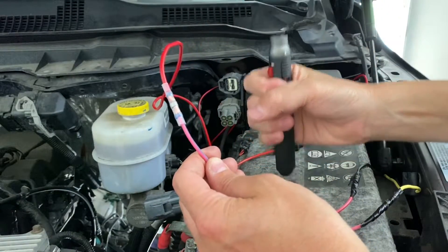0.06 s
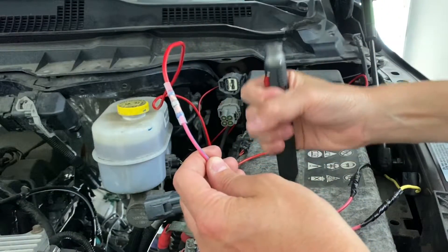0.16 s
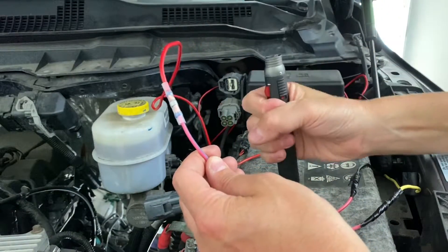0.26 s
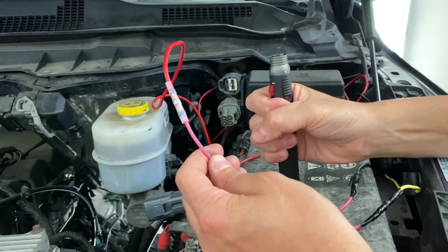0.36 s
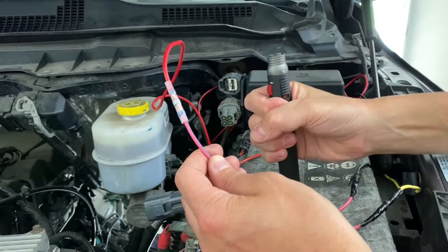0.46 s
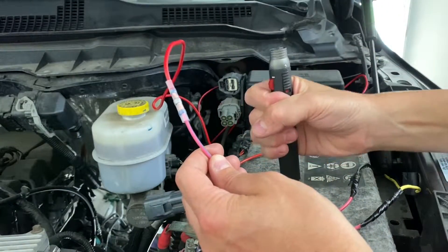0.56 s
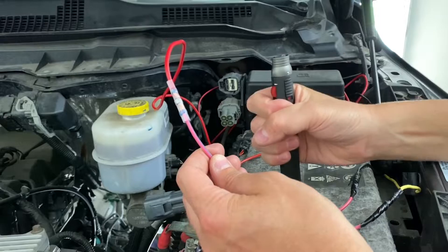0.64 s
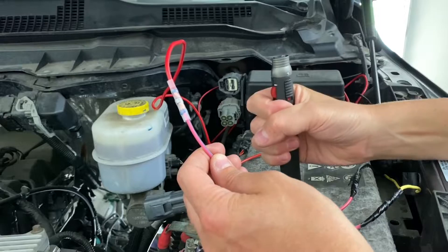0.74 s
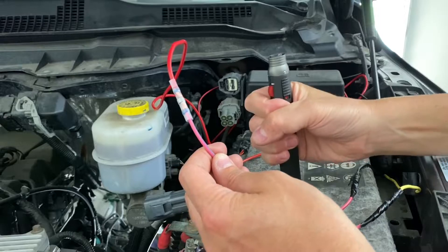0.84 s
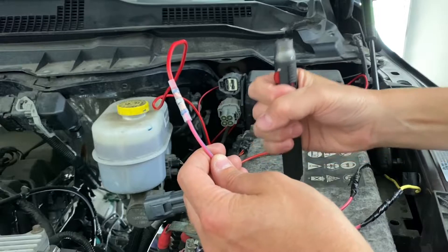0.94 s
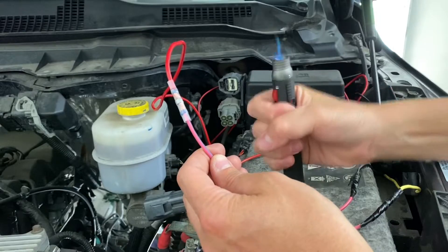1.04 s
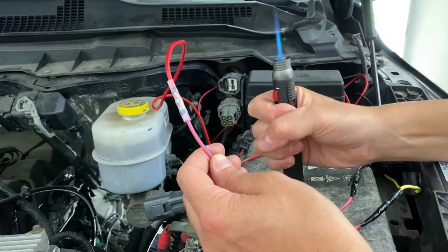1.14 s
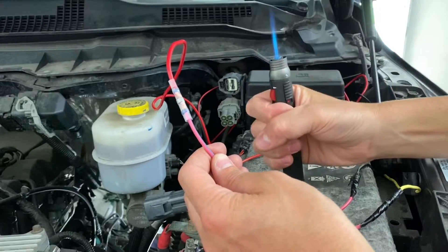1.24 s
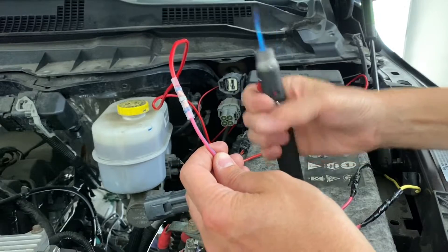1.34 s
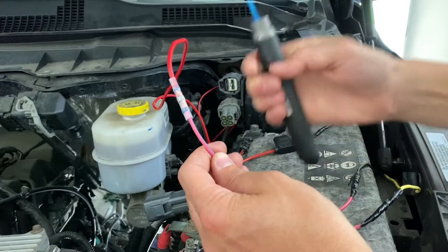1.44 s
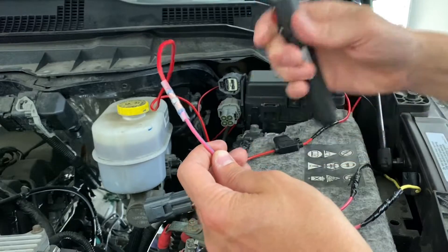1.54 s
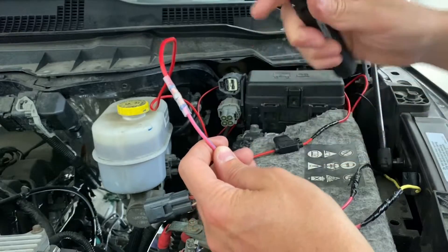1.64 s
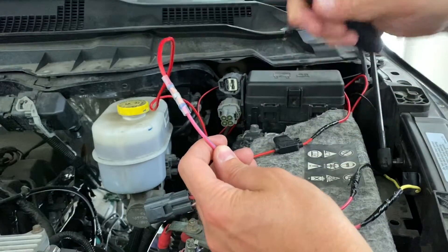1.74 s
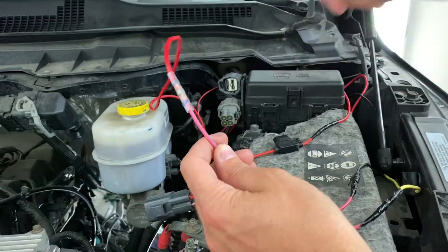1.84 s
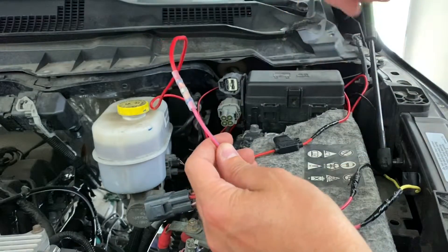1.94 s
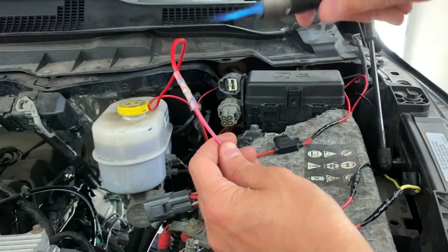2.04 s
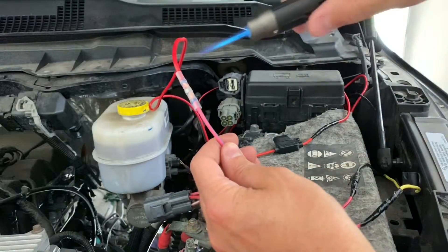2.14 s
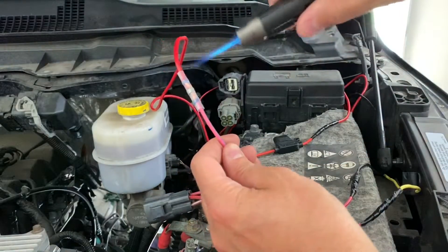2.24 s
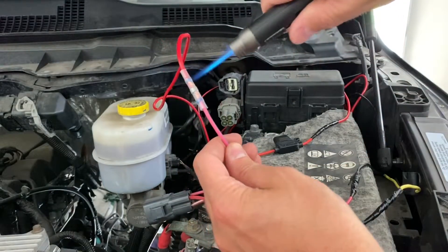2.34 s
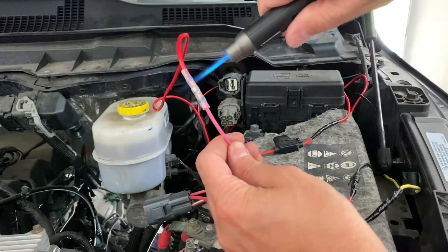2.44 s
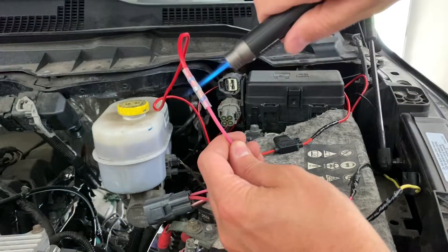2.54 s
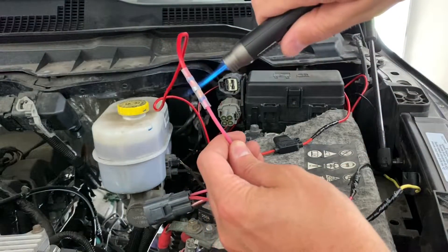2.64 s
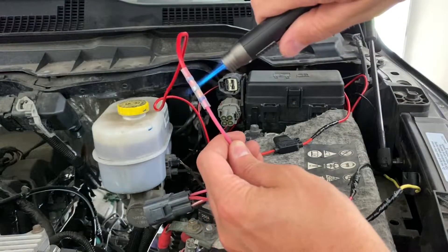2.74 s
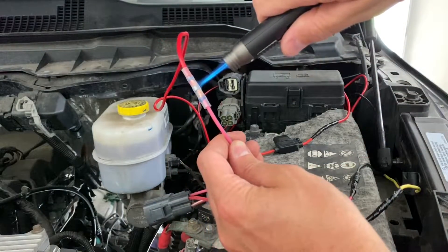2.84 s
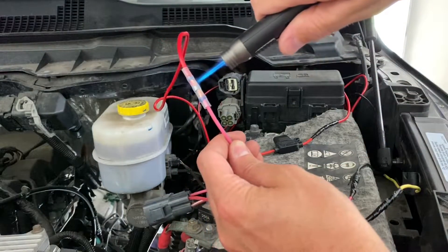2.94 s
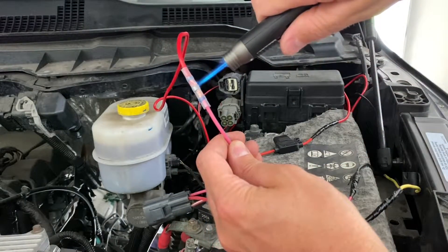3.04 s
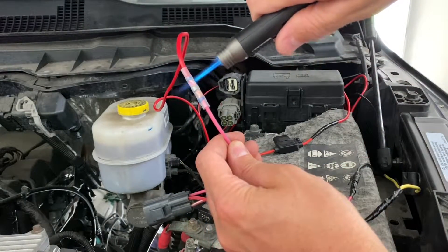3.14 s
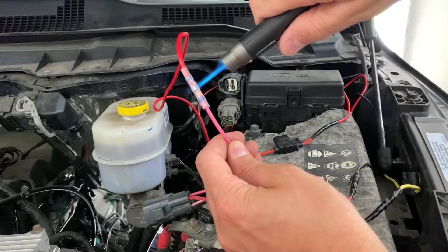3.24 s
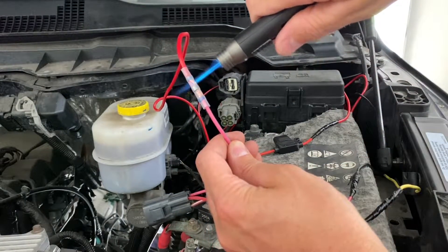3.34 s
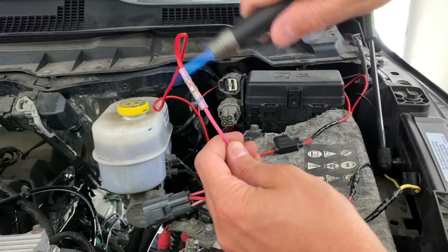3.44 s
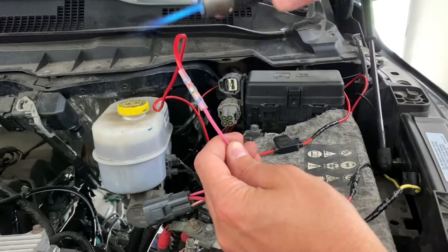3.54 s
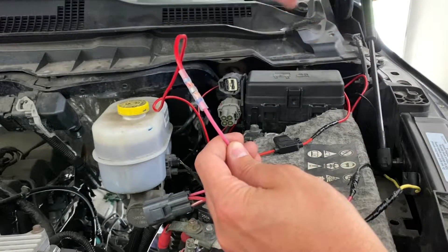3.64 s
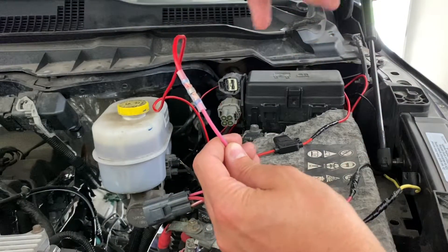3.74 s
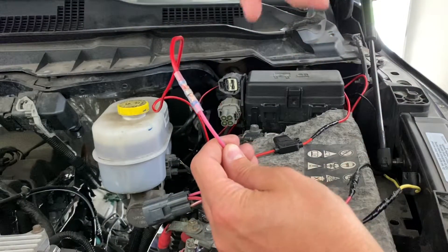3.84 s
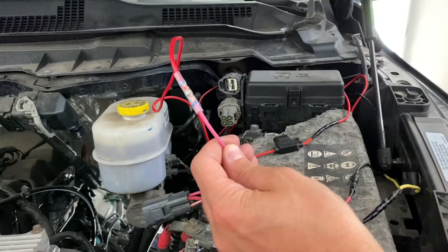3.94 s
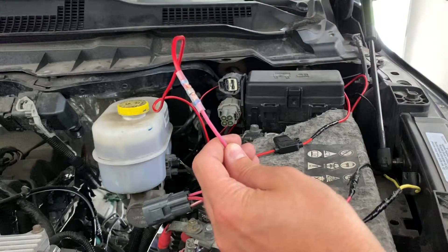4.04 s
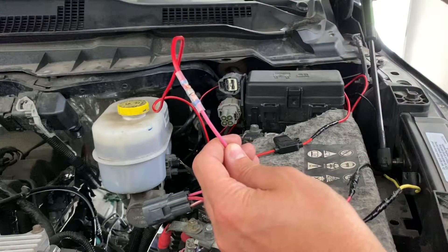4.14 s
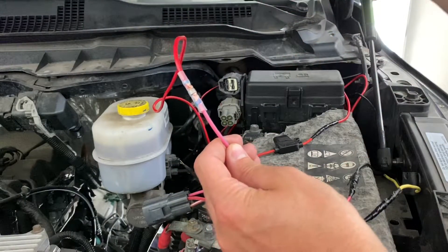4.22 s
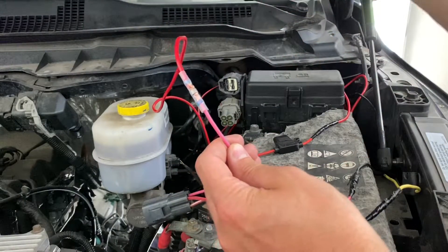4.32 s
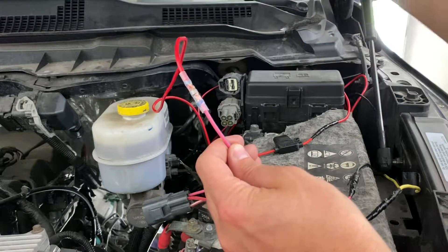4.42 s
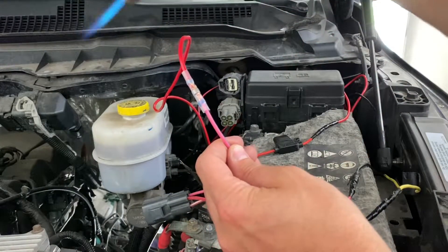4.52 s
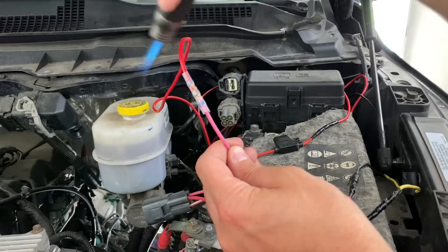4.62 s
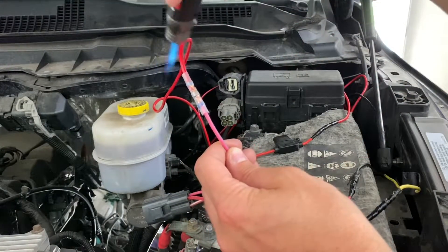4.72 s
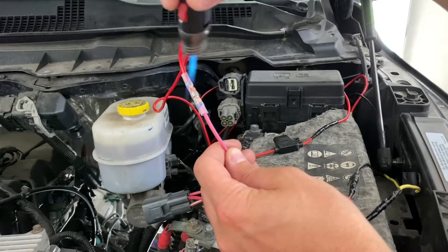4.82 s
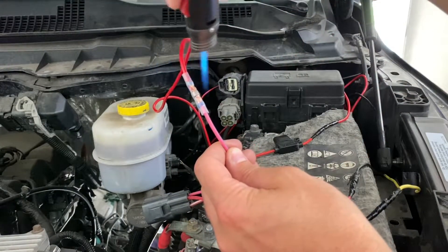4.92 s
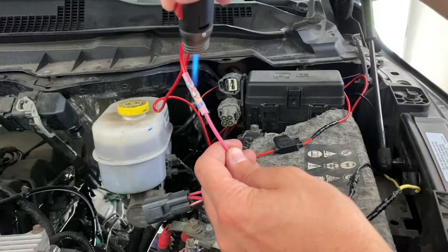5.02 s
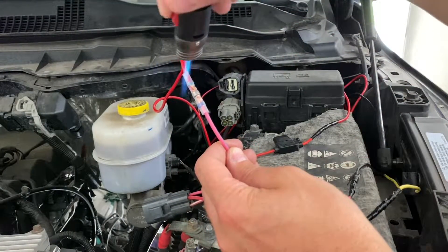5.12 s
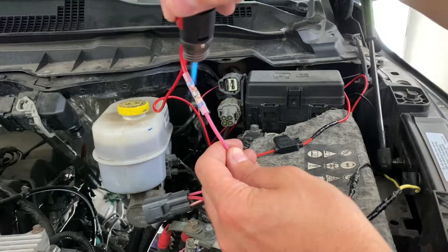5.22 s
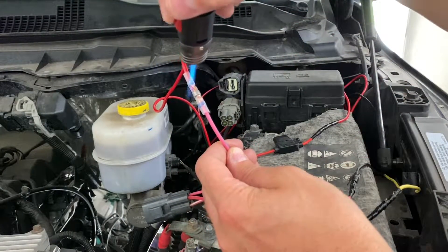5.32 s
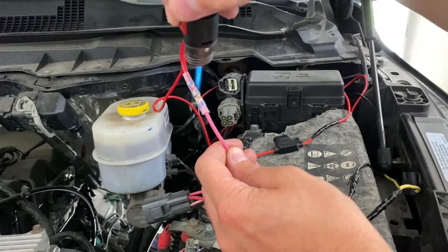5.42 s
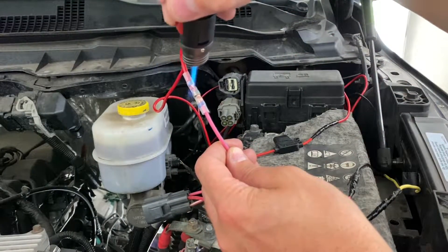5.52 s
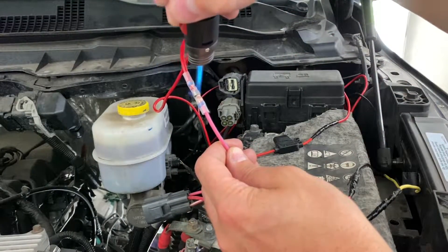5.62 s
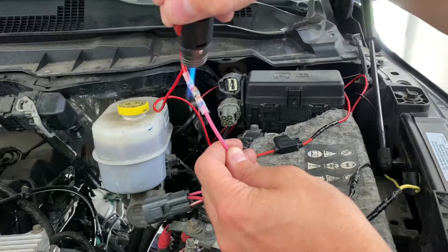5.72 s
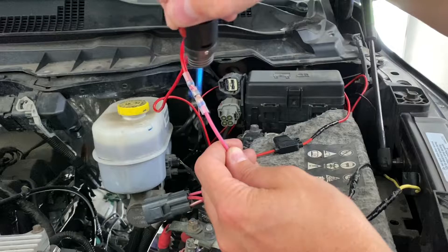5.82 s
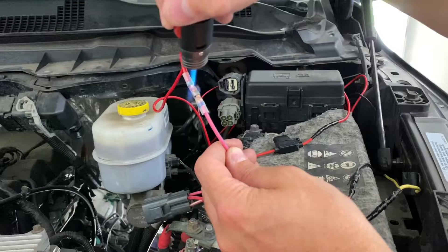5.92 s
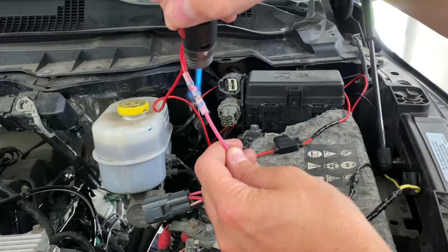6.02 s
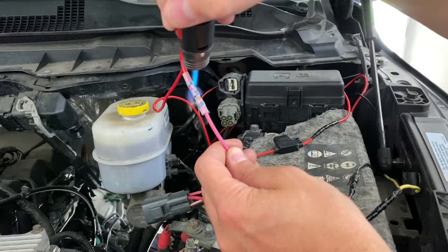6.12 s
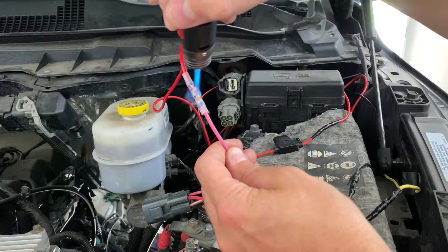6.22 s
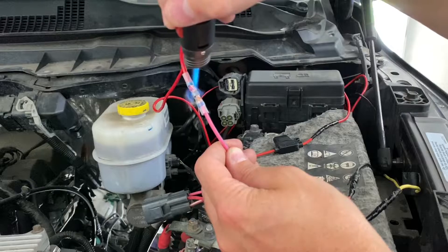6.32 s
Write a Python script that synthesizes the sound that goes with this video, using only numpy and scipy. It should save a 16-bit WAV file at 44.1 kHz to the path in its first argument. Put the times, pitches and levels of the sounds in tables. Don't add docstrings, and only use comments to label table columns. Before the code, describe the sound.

Close to a phone in a garage, a pencil torch hisses very faintly while its plastic slider ticks and its igniter snaps hard three times in the first second. The third snap lights it with a soft low thump. A quiet, airy flame follows, fluttering in short gusts whenever the hand swings, steadier when held. Low traffic rumble lies behind, rising toward the end.

```python
import sys
import numpy as np
from scipy import signal
from scipy.fft import rfft, irfft, next_fast_len
from scipy.io import wavfile
from scipy.ndimage import uniform_filter1d, map_coordinates

SR = 44100
rng = np.random.default_rng(int(sys.argv[2]) if len(sys.argv) > 2 else 0)


def voltage_ratio(level):
    return 10 ** (np.asarray(level, float) / 20)


def store_pcm(level_fs):
    pcm = np.round(np.clip(level_fs, -1, 1) * 32767).astype(np.int16)
    wavfile.write(sys.argv[1], SR, np.atleast_2d(pcm).T)


N = 280917


def unit(x):
    return x / np.sqrt(np.mean(x ** 2) + 1e-20)


def along(points, hz):
    f, v = np.transpose(points)
    return np.interp(np.log(hz + 1), np.log(f + 1), v)


def curves(rows):
    s, *cols = np.transpose(rows)
    return [np.interp(np.arange(N) / SR, s, c) for c in cols]


def wobble(rate_hz):
    knots = rng.standard_normal(int(N * rate_hz / SR) + 4)
    return map_coordinates(knots, [np.arange(N) * rate_hz / SR])


def filtered(x, response):
    m = next_fast_len(N + SR // 2)
    return irfft(rfft(x, m) * response(np.fft.rfftfreq(m, 1 / SR)), m)[..., :N]


def modes(table):
    def response(f):
        total = 0
        for k, (c, w, db) in enumerate(table):
            total = total + (-1) ** k * voltage_ratio(db) * 1j * f * w / (c * c - f * f + 1j * f * w)
        return total
    return response


# f/Hz, correlation/1
LIKENESS = [(60, .975), (130, .94), (290, .7), (640, .45), (1400, .5), (3100, .35), (6800, .5)]


def rush(response, patchy_db):
    z = signal.stft(rng.standard_normal((2, N)), nperseg=512)[2]
    field = uniform_filter1d(rng.standard_normal(z.shape[1:]), size=5, axis=0)
    field = uniform_filter1d(field, size=10, axis=1)
    pair = signal.istft(z * voltage_ratio(patchy_db * unit(field)), nperseg=512)[1][:, :N]

    def mid_side(hz):
        turn = np.arccos(np.clip(along(LIKENESS, hz), -1, 1)) / 2
        return response(hz) * [np.cos(turn), np.sin(turn)]

    mid, side = filtered(pair, mid_side)
    return unit(np.array([mid + side, mid - side]))


# t/s, level/dB
TRAFFIC = [(0, -59), (1.9, -57.5), (2.4, -57.5), (3.3, -58), (3.9, -57), (4.5, -54.5), (4.9, -51.5),
           (6.37, -50.5)]
# f/Hz, level/dB
RUMBLE_SPECTRUM = [(15, -51), (25, -20), (34, -15.5), (80, 3.5), (140, -5.5), (182, -9), (238, -11.5),
                   (316, -16), (420, -12.5), (550, -43), (920, -120)]
# f/Hz, width/Hz, level/dB
FAR_ENGINE = [(58.4, 6.8, 0)]
# f/Hz, level/dB
AIR_SPECTRUM = [(90, -43), (150, -11.5), (300, -5), (500, -10), (800, -11), (1500, -14), (2650, -24),
                (3050, -36.5), (3600, -27.5), (6000, -29), (7200, -45), (8000, -9.5), (10000, -46.5),
                (16500, -90)]


def background():
    level_db, = curves(TRAFFIC)
    mean_db = level_db.mean()
    swell_db = level_db - mean_db
    rumble = unit(voltage_ratio(1.17 * wobble(13)) * rush(lambda hz: voltage_ratio(along(RUMBLE_SPECTRUM, hz)), patchy_db=1.4))
    drone = rush(modes(FAR_ENGINE), patchy_db=0.5)
    air = rush(lambda hz: voltage_ratio(along(AIR_SPECTRUM, hz)), patchy_db=2.1)
    street = voltage_ratio(mean_db + 5 + 0.71 * swell_db) * rumble + voltage_ratio(mean_db + 5 + 1.1 * swell_db) * drone
    return street + voltage_ratio(-59) * air


SNAP_T_S = [
    .2633,
    .6152,
    1.0518,
]
SNAP_LEVEL_DB = [-10.5, -10, -9]


def blows():
    rebound_s, rebound_db, rattle_s = .0024, -0.7, 0.0015
    snaps = list(zip(SNAP_T_S, SNAP_LEVEL_DB))
    first = [(s, db, db - 15, rattle_s) for s, db in snaps]
    second = [(s + rebound_s, db + rebound_db, db - 16, rattle_s) for s, db in snaps]
    return first + second


# f/Hz, level/dB
WALL_COLOUR = [(300, -12), (600, -2.5), (1000, 3), (2000, 3), (3200, -2), (3800, -4.5), (4150, 4.5),
               (4600, 0), (5100, -3), (6700, -3), (9000, -8.5), (14000, -14.5), (17000, -26)]
# f/Hz, t60/s
GARAGE_T60 = [(300, 0.78), (1000, 0.3), (4000, 0.77), (8000, 0.74), (14000, 0.26)]


def garage():
    length = SR * 2 // 3
    hz, t, _ = signal.stft(np.zeros(length), SR, nperseg=256)
    walls = voltage_ratio(-60 * t / along(GARAGE_T60, hz)[:, None] - 13)
    metal = voltage_ratio(-60 * t / 0.035)
    decay = voltage_ratio(along(WALL_COLOUR, hz))[:, None] * (walls + metal)
    tank = np.abs(modes(TANK_MODES)(hz))[:, None]
    out = np.zeros((2, N))
    for s, db, knock_db, _ in blows() + SLIDER_TICKS:
        z = signal.stft(rng.standard_normal((2, length)), nperseg=256)[2]
        strength = np.hypot(voltage_ratio(db), voltage_ratio(knock_db + 18) * tank)
        tail = signal.istft(z * decay * strength, nperseg=256)[1][:, :length]
        out[:, round(s * SR) + 90:][:, :length] += tail
    return voltage_ratio(-14) * out


# f/Hz, width/Hz, level/dB
TANK_MODES = [(560, 300, -6), (960, 230, 0), (1400, 400, -11)]


def contacts(events, body, t60_s):
    bright, dull, t = np.zeros(N + SR), np.zeros(N), np.arange(SR // 20) / SR
    for s, db, knock_db, length_s in events:
        chips = rng.standard_normal(len(t)) * voltage_ratio(3.6 * rng.standard_normal(len(t)))
        decay = voltage_ratio(-60 * np.maximum(t - length_s, 0) / t60_s)
        shape = (1 + 0.72 * np.exp(-t / 0.00056)) * decay
        rattle = unit(shape * chips) * np.sqrt(np.mean(shape ** 2))
        bright[round(s * SR):][:len(t)] += voltage_ratio(db - 2) * rattle
        dull[round(s * SR) + 20] = voltage_ratio(knock_db + 38)
    knock = filtered(dull, lambda hz: modes(TANK_MODES)(hz) ** 2)
    return filtered(bright[:N], body) + knock


# t/s, peak/dB, tank knock/dB, rattle/s
SLIDER_TICKS = [(.0050, -35, -70, 0.0014), (.0180, -22, -28.5, 0.0034), (0.1866, -28.5, -26, 0.00068),
                (0.472, -51, -45, .001), (0.5374, -22, -30, 0.00078), (0.546, -40, -32.5, .001),
                (0.588, -33, -28, 0.00074), (0.5922, -40, -31, .001), (0.834, -53.5, -42.5, 0.0011),
                (0.8904, -24.5, -29, 0.0014), (0.8938, -32, -39, 0.0014), (0.8961, -41.5, -31.5, .001),
                (0.901, -42.5, -59, .001), (1.0356, -26.5, -23, 0.00082), (1.3228, -23.5, -30.5, 0.0031),
                (1.329, -31.5, -30, 0.00091)]
# f/Hz, width/Hz, level/dB
SLIDER_MODES = [(2300, 880, 2.4), (4350, 390, 5.5), (6100, 4400, -10.5), (9800, 1500, -16),
                (13540, 3800, -18)]
# f/Hz, width/Hz, level/dB
CRACK_MODES = [(2370, 4200, -4.5), (5930, 3700, -3.5), (10200, 6600, -3.5), (14180, 6800, -7)]
# f/Hz, width/Hz, level/dB
SHELL_MODES = [(1880, 470, -4.5), (2500, 200, -10.5), (4010, 330, -1.5), (5100, 203, -14),
               (5870, 310, -17.5), (6730, 640, -3), (8980, 500, -7)]
# f/Hz, width/Hz, level/dB
ANVIL_MODES = [(1050, 620, 16.5), (1450, 440, 14.5), (1934, 600, 13)]


def igniter():
    steel = lambda hz: modes(CRACK_MODES)(hz) + 1.42 * modes(SHELL_MODES)(hz)
    hammer = contacts(blows(), steel, t60_s=0.0011)
    push = np.zeros(N)
    push[np.round(np.array(SNAP_T_S) * SR).astype(int) + 22] = voltage_ratio(SNAP_LEVEL_DB)
    slider = contacts(SLIDER_TICKS, modes(SLIDER_MODES), t60_s=0.0062)
    return (hammer + filtered(push, modes(ANVIL_MODES)) + slider) * voltage_ratio([[.4], [-.4]])


# t/s, level/dB, f/Hz, t60/s
PUFFS = [
    (.275, -35.5, 153, 0.029),
    (.628, -43, 186, 0.064),
    (1.06, -38.5, 95.4, 0.16),
]


def ignition():
    t = np.maximum(np.arange(N) / SR - np.array(PUFFS)[:, :1], 0)
    db, hz, t60_s = np.array(PUFFS).T[1:, :, None]
    swell = 1 - np.exp(-t / 0.0058)
    return 3 * np.sum(voltage_ratio(db - 60 * t / t60_s) * swell * np.sin(2 * np.pi * hz * t), 0)


# start/s, end/s, f/Hz, level/dB
TUBE_NOTES = [(1.25, 1.85, 1185, -61.5), (2.1, 3.5, 1484, -65), (3.55, 3.85, 933, -57),
              (3.902, 4.423, 1110, -60.5), (5.2, 5.948, 935, -64)]


def singing():
    t, out, breath = np.arange(N) / SR, 0, rng.standard_normal(N)
    for start, end, note_hz, db in TUBE_NOTES:
        held = np.clip(np.minimum(t - start, end - t) / 0.082, 0, 1)
        note = signal.lfilter(*signal.iirpeak(note_hz, 5, SR), breath)
        note = signal.lfilter(*signal.iirpeak(note_hz, 9, SR), note)
        out = out + voltage_ratio(db + 1.6 * wobble(9.7)) * held * unit(note)
    return out * voltage_ratio([[1.8], [-1.8]])


def burning():
    lit_s, catch_s = 1.01, 0.13
    return np.clip((np.arange(N) / SR - lit_s) / catch_s, 0, 1)


# start/s, end/s, extra path/ms, strength/1
MIRRORS = [
    (-.2, 1.5, 1.85, .45),
    (2.2, 3.45, .95, .33),
    (4.95, 6.6, .96, .35),
]


def resting():
    settle_s, tremor_ms = .2, .04
    t = np.arange(N) / SR
    start, end, ms, strength = np.array(MIRRORS).T[:, :, None]
    held = np.clip(np.minimum(t - start, end - t) / settle_s, 0, 1)
    nearest = np.argmin(np.maximum(start - t, t - end), axis=0)
    return ms[nearest, 0] + tremor_ms * wobble(2.5), np.sum(strength * held, axis=0)


# t/s, jet level/dB, flame stirring/1
HAND_MOTION = [(0, -59.5, .6), (1.05, -59.5, 0.95), (1.25, -58.5, .6), (1.6, -57.5, 1), (1.85, -53.5, 0.62),
               (2.02, -52.5, 0.23), (2.25, -56, 0.43), (2.7, -56, 0.3), (3.02, -60, 0.79),
               (3.25, -57.5, 0.35), (3.45, -55.5, 0.32), (3.65, -54, 0.96), (4.2, -58, 0.61),
               (4.56, -57, 0.81), (4.85, -55.5, 0.68), (5.2, -56.5, 0.2), (5.65, -55.5, 0.31),
               (6.37, -55, 0)]
# f/Hz, level/dB
NOZZLE_SPECTRUM = [(6000, -30), (8000, -31), (10000, -8), (11500, -1.5), (13000, 2.5), (14500, 2.5),
                   (15600, -8.5), (16500, -23)]
# t/s, level/dB
NOZZLE_SPITS = [(3.551, -48), (3.9, -52), (4.37, -34.5), (4.901, -48), (6.262, -49.5)]


def jet():
    high_db, stir = curves(HAND_MOTION)
    low_db = high_db - 7 + burning() * (2.5 + 5 * stir)
    path_ms, strength = resting()
    gas = rng.standard_normal(N) * voltage_ratio(1.6 * wobble(25))
    mirror = lambda ms: map_coordinates(gas, [np.arange(N) - ms * SR / 1000], mode="nearest")
    combed = gas + strength * (mirror(path_ms) + 0.55 * mirror(path_ms + 1.1))
    upper = lambda hz: np.clip((hz - 11000) / 2200, 0, 1)
    low = unit(filtered(combed, lambda hz: voltage_ratio(along(NOZZLE_SPECTRUM, hz)) * (1 - upper(hz))))
    high = unit(filtered(combed, lambda hz: voltage_ratio(along(NOZZLE_SPECTRUM, hz)) * upper(hz)))
    t = np.arange(N) / SR - np.array(NOZZLE_SPITS)[:, :1]
    spit_db = np.array(NOZZLE_SPITS)[:, 1:] - 60 * np.abs(t - .001) / 0.024
    burst = np.sum(voltage_ratio(spit_db) * (t > 0), axis=0)
    spray = filtered(rng.standard_normal(N), lambda hz: hz / (hz + 1500) + modes([(1600, 300, 6)])(hz))
    return voltage_ratio(low_db) * low + voltage_ratio(high_db + 2) * high + burst * spray


# f/Hz, width/Hz, level/dB
TUBE_MODES = [(429, 95, 2), (665, 90, 2.5), (958, 110, 0), (1253, 151, -4), (1520, 140, -8),
              (2044, 48, -10), (2615, 150, -17)]
# f/Hz, level/dB
TEAR_SPECTRUM = [(250, -9.5), (500, -5.5), (1400, -3.5), (2200, -4), (3400, -9.5), (5500, -13.5),
                 (7600, -15.5), (9500, -13), (12000, -26), (17000, -62.5)]
# start/s, length/s, level/dB, loudest tube note f/Hz
SWINGS = [(1.57, 0.05, -43.5, 1210), (1.762, 0.08, -39.5, 1100), (1.899, 0.071, -36.5, 1050),
          (1.977, 0.14, -47.5, 1006), (2.96, 0.047, -51, 1400), (2.999, 0.04, -42, 1530),
          (3.089, 0.032, -44.5, 1030), (3.444, 0.072, -50, 1320), (3.664, 0.031, -46.5, 980),
          (3.925, 0.043, -61, 1100), (4.025, 0.052, -48, 1090), (4.113, 0.048, -52.5, 1100),
          (4.197, 0.059, -43.5, 706), (4.395, 0.06, -37, 1150), (4.457, 0.067, -39.5, 570),
          (4.55, 0.032, -46, 1400), (4.588, 0.036, -40.5, 900), (4.704, 0.073, -44.5, 1010),
          (5.066, 0.045, -48.5, 910)]


def flame():
    stir = curves(HAND_MOTION)[1]
    ragged = wobble(110)

    def tube(hz):
        return modes(TUBE_MODES)(hz) * hz ** 2 / (hz ** 2 + 300 ** 2) / (1 + (hz / 2850) ** 12)

    roar = unit(voltage_ratio(1.2 * ragged) * rush(tube, patchy_db=1.2))
    tearing = rush(lambda hz: voltage_ratio(along(TEAR_SPECTRUM, hz)), patchy_db=2.5)
    flutter = unit(voltage_ratio(2.2 * ragged + 1.6 * wobble(600)) * tearing)
    roar_db = -55 + 2 * stir
    flutter_db = -70.5 + 13.5 * stir + 0.88 * wobble(7.6)
    out = burning() * (voltage_ratio(roar_db) * roar + voltage_ratio(flutter_db) * flutter)
    gust_roar, gust_flutter = roar[:, ::-1], flutter[:, ::-1]
    for s, length_s, torn_db, note_hz in SWINGS:
        span = slice(round((s - .02) * SR), round((s + length_s + .03) * SR))
        t = np.arange(N)[span] / SR
        rise = np.clip((t - s) / 0.026 + .5, 0, 1)
        fall = np.clip((s + length_s - t) / 0.036 + .5, 0, 1)
        note = signal.lfilter(*signal.iirpeak(note_hz, 3, SR), gust_roar[:, span])
        torn = unit(voltage_ratio(2.6 * ragged[span]) * (0.76 * gust_roar[:, span] + 0.71 * note))
        fray = voltage_ratio(torn_db - 10 + 6.5 * stir[span]) * gust_flutter[:, span]
        out[:, span] += rise * fall * (voltage_ratio(torn_db - 3) * torn + fray)
    return out * voltage_ratio([[1.8], [-1.8]])


def scene():
    return background() + garage() + igniter() + ignition() + singing() + jet() + flame()


# f/Hz, level per bin/dB
GATE_THRESHOLD = [(2300, -120), (2900, -90.5), (6500, -96), (8000, -100), (9000, -120)]


def suppress(x):
    hz, _, z = signal.stft(x, SR, nperseg=1024)
    power = uniform_filter1d(np.abs(z.mean(0)) ** 2, size=3, axis=0)
    power = uniform_filter1d(power, size=3, axis=1)
    threshold = voltage_ratio(along(GATE_THRESHOLD, hz))[:, None] ** 2
    keep = 1 / (1 + (threshold / (np.abs(power) + 1e-20)) ** 3)
    return signal.istft(z * keep, SR, nperseg=1024)[1][:, :N]


def top_cut(x):
    return signal.sosfilt(signal.butter(12, 16850, fs=SR, output="sos"), x)


# f/Hz, lag/cycles
PORT_LAG = [(0, 0), (5200, -.11), (6500, 0), (8350, .5), (10050, 1), (12100, 1.5), (14050, 2), (15800, 2.5),
            (22050, 4)]


def record(dry):
    band = lambda hz: hz ** 4 / (hz ** 4 + 45 ** 4) / (1 + (hz / 16300) ** 40)
    single = lambda hz: np.clip((hz - 7600) / 800, 0, 1)
    lag = lambda hz: np.exp(-1j * np.pi * np.interp(hz, *np.transpose(PORT_LAG)))
    left = filtered(dry[0], lambda hz: band(hz) * lag(hz))
    right = filtered(dry, lambda hz: band(hz) / lag(hz) * [single(hz), 1 - single(hz)]).sum(0)
    return top_cut(suppress(np.array([left, right])))


dry = scene()
out = record(dry)
store_pcm(out)
```